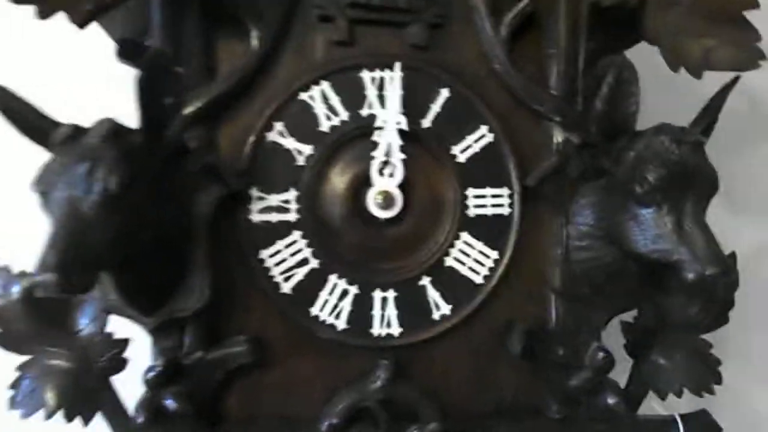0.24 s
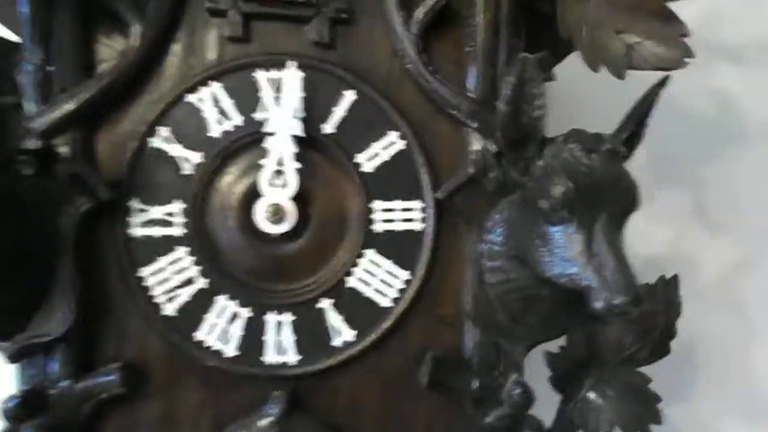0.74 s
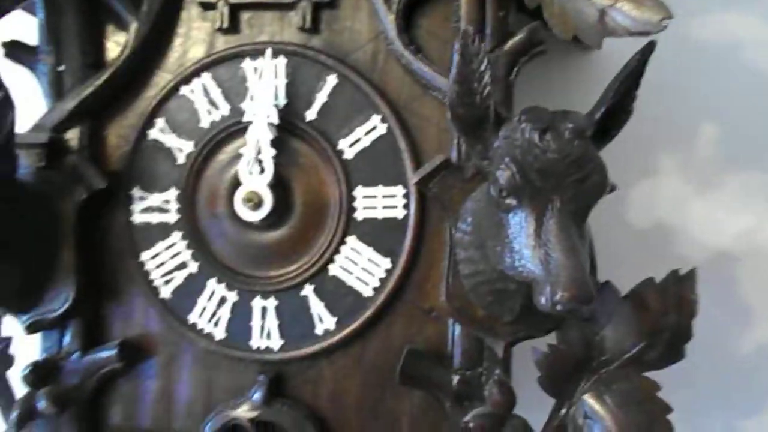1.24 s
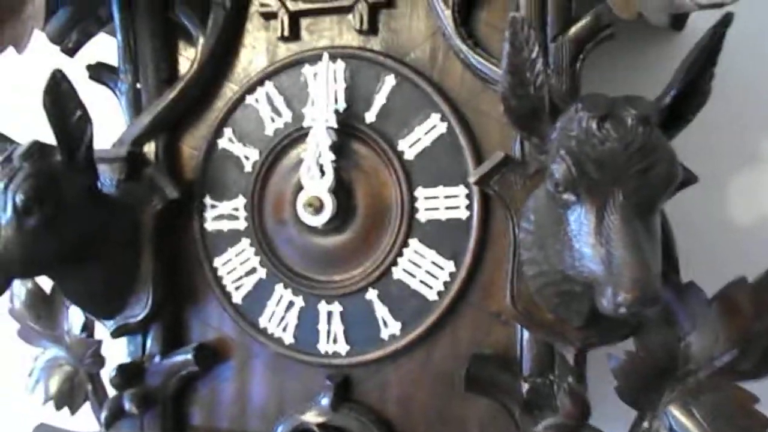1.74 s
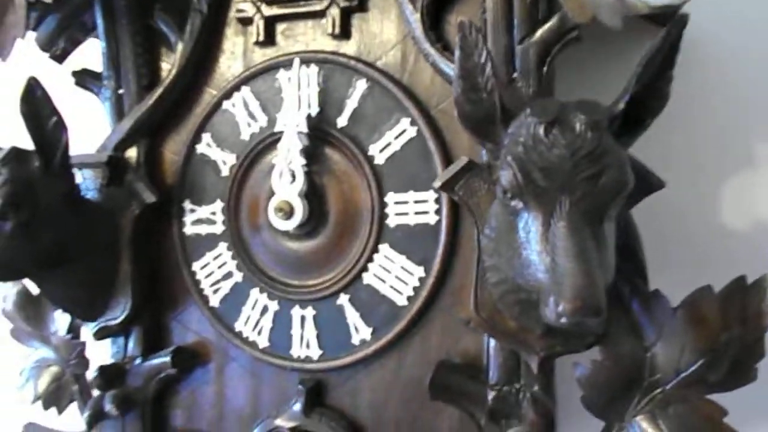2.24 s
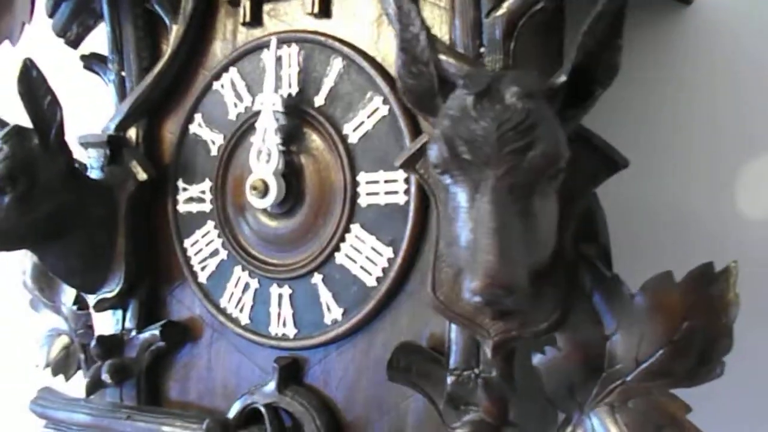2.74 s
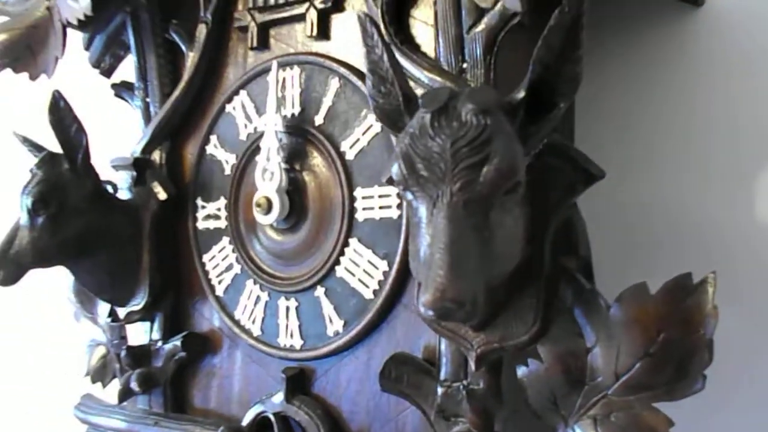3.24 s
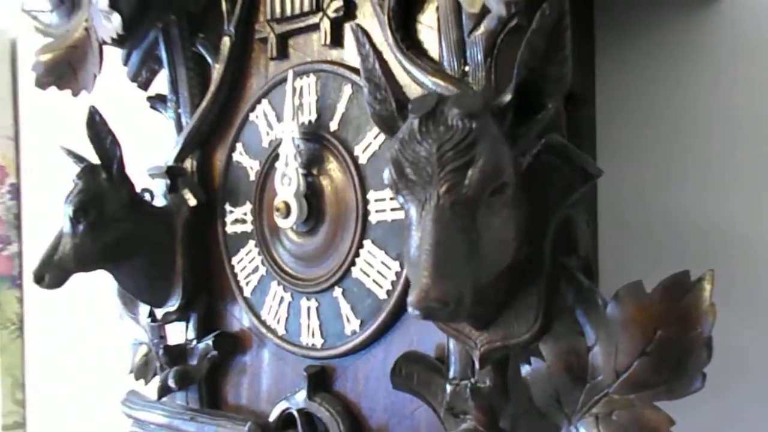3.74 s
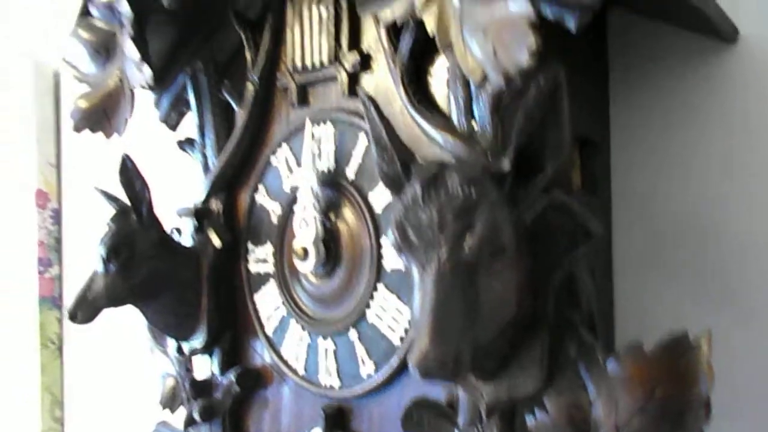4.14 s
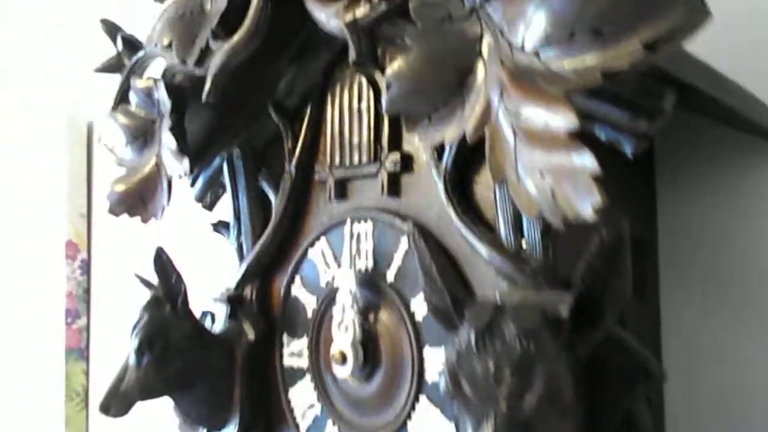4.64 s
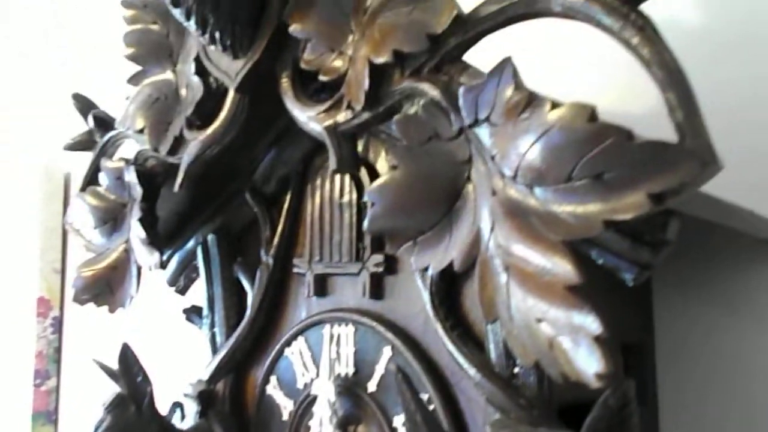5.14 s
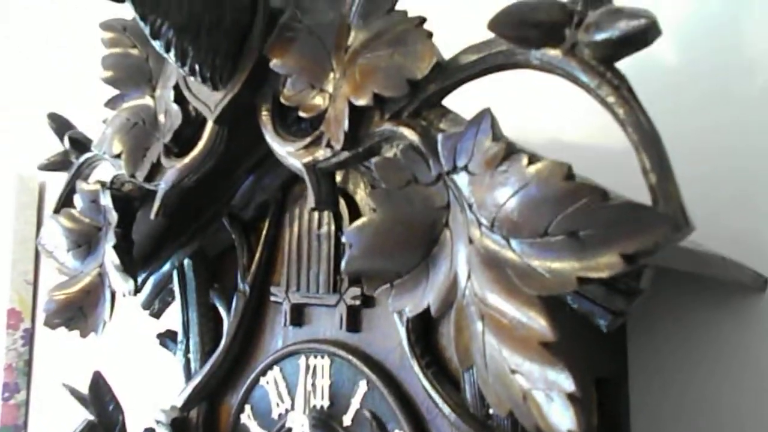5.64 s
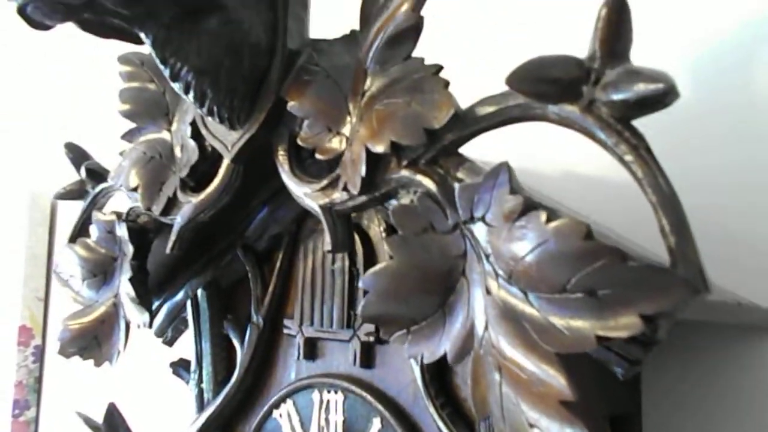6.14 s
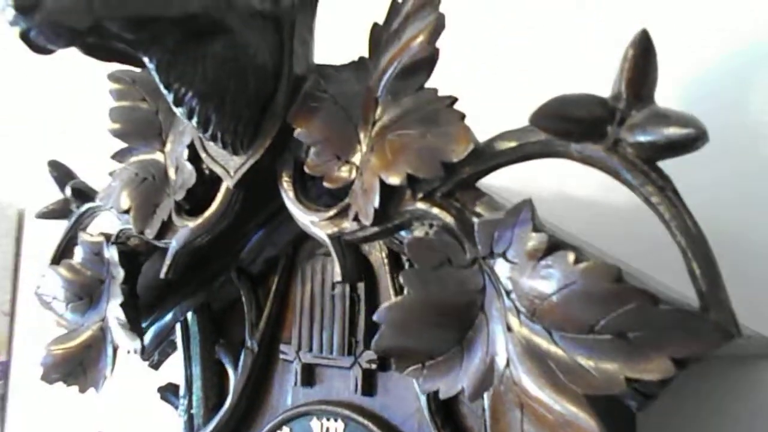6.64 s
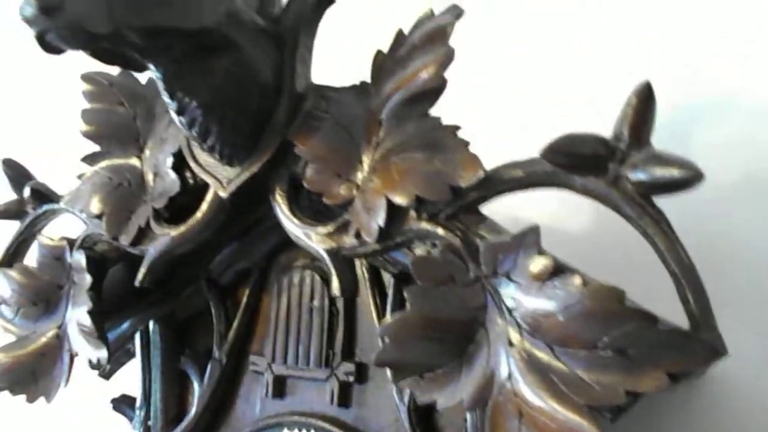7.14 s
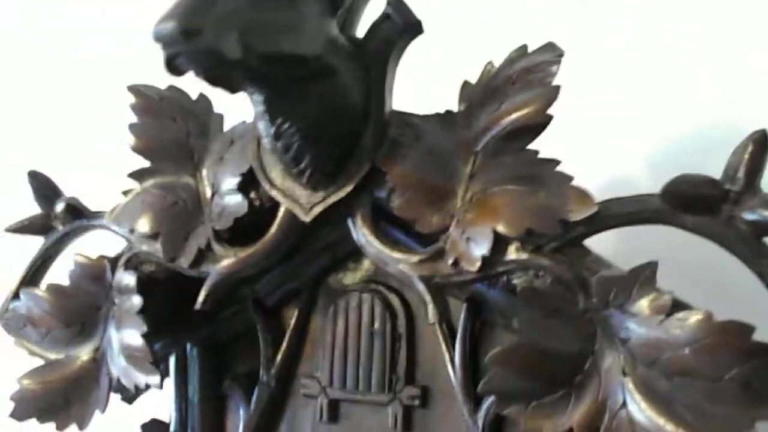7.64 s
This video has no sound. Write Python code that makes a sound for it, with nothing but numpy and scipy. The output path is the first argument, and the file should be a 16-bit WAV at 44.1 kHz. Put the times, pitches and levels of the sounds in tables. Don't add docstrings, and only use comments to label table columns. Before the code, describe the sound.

Close, woody tick-tock of a carved clock in a quiet room, an early floor creak, soft rustling and later dry finger taps.

```python
import sys
import numpy as np
from scipy import signal
from scipy.fft import rfft, irfft, next_fast_len
from scipy.io import wavfile

SR = 44100
rng = np.random.default_rng(int(sys.argv[2]) if len(sys.argv) > 2 else 0)


def volts(x):
    e = np.asarray(x, float) / 20
    return 10 ** e


def to_wav(s):
    ch = np.atleast_2d(s).T
    pcm = np.round(np.clip(ch, -1, 1) * 32767)
    wavfile.write(sys.argv[1], SR, pcm.astype(np.int16))


N = 347067


def rms_one(x):
    return x / np.sqrt(np.mean(x ** 2) + 1e-20)


def shaped(x, gain_at):
    size = next_fast_len(N + 4096)
    hz = np.maximum(np.arange(size // 2 + 1) * SR / size, 1)
    return irfft(rfft(x, size) * gain_at(hz), size)[:N]


def shaped_noise(gain_at):
    return rms_one(shaped(rng.standard_normal(N), gain_at))


def at_hz(points, hz):
    corner_hz, level_db = np.transpose(points)
    return np.interp(np.log(hz), np.log(corner_hz), level_db)


def highpass(x, order, hz):
    return signal.sosfilt(signal.butter(order, hz, "high", fs=SR, output="sos"), x)


def drift(rate_hz):
    hop = 40
    r = np.exp(-2 * np.pi * hop * rate_hz / SR)
    chance = rng.standard_normal(N // hop + 2002)
    slow = signal.lfilter([1], [1, -2 * r, r * r], chance)[2000:]
    return np.interp(np.arange(N) / hop, np.arange(len(slow)), rms_one(slow))


def clicks(times, sizes):
    out = np.full(N, 1e-18)
    np.add.at(out, np.round(np.ravel(times) * SR).astype(int), np.ravel(sizes))
    return out


def ring(x, hz, t60):
    r = volts(-60 / (t60 * SR))
    w = 2 * np.pi * hz / SR
    return signal.lfilter([0, np.sin(w)], [1, -2 * r * np.cos(w), r * r], x)


# (time [s], rustle level [dB])
MOTION = [
    (0, -65),
    (1.1, -64),
    (2.6, -66.5),
    (3.1, -74),
    (4.4, -72),
    (5.1, -74),
    (6.7, -75),
    (7.1, -66.5),
    (7.87, -70),
]
# (time [s], half length [s], rustle level [dB], hiss relative to rustle [dB])
BRUSHES = [(0.305, 0.053, -56.5, -27), (0.53, 0.24, -60.5, -17.5), (0.88, 0.046, -57, -22),
           (1.148, 0.053, -70, -2), (1.402, 0.05, -60.5, -17), (1.925, 0.081, -60.5, -14.5),
           (2.534, 0.1, -74, -1.5), (3.03, 0.099, -73.5, -11), (3.923, 0.17, -64.5, -24),
           (5.46, 0.038, -81, -16), (7.365, 0.062, -61.5, -23.5), (7.8, 0.12, -65.5, -17)]
# (frequency [Hz], density [dB per Hz])
RUSTLE_COLOUR = [(500, -8), (1200, -1), (3000, 0), (5000, -0.5), (7000, 1)]
# (frequency [Hz], density [dB per Hz])
HUM_COLOUR = [(20, -51), (38, -18.5), (167, -3.5), (318, -3), (497, -5.5), (2500, -18.5), (3250, -32),
              (5500, -120)]


def air(flicker_db):
    hiss_under_db, hum_still_db, hum_under_db = -15.5, -65, 0.5
    split_hz = 7000
    t = np.arange(N) / SR
    moving = volts(2 * np.interp(t, *np.transpose(MOTION)))
    rustle_power = moving.copy()
    hiss_power = moving * volts(2 * hiss_under_db)
    for s, half, level_db, hiss_db in BRUSHES:
        swell = volts(2 * level_db) * np.exp(-((t - s) / half) ** 2)
        rustle_power = rustle_power + swell
        hiss_power = hiss_power + swell * volts(2 * hiss_db)
    hum_power = volts(2 * hum_still_db) + rustle_power * volts(2 * hum_under_db)
    rustle = shaped_noise(lambda hz: volts(at_hz(RUSTLE_COLOUR, hz)) * (hz < split_hz))
    hum = shaped_noise(lambda hz: volts(at_hz(HUM_COLOUR, hz)))
    hiss = shaped_noise(lambda hz: (hz > split_hz) * (hz < 12000))
    cloth = rustle * volts(4.5) * np.sqrt(rustle_power) + hiss * volts(17.5) * np.sqrt(hiss_power)
    cloth_flicker = volts(0.45 * flicker_db * drift(14.0))
    hum_flicker = volts(flicker_db * drift(17.0))
    return cloth_flicker * cloth + hum * np.sqrt(hum_power) * hum_flicker


def snap_and_crack(times, facing_db, crack_hz, snap_db, crack_db, crack_t60):
    out = highpass(volts(snap_db) * clicks(times, volts(facing_db)), 2, 2500)
    t = np.arange(1024) / SR
    envelope = volts(-60 * t / crack_t60) * np.clip(t / 0.0004, 0, 1)
    sizes = volts(facing_db + crack_db)
    for s, size, hz in zip(times.ravel(), sizes.ravel(), np.repeat(crack_hz, times.shape[1])):
        i = round(s * SR)
        out[i:i + len(t)] += size * np.sin(2 * np.pi * hz * t) * envelope
    return out


# (frequency [Hz], tick [dB], tock [dB], play
# [dB], t60 [s])
MODES = [(428, -21, -15, -21, 0.35), (645, -7.5, -2, 5, 0.03), (762, 1.5, 3.5, 2.5, 0.053),
         (882, -2.5, -1, -21, 0.046), (1013, -6, -9.5, -18, 0.076), (1176, -19.5, -19, -23, 0.08),
         (1423, 7.5, -1, -16, 0.061), (1590, -4.5, -12, 4.5, 0.042), (1668, 1, -3.5, 2, 0.047),
         (1835, 5, -2.5, -1, 0.014), (1900, -3, -13, -13, 0.071), (2044, 4, -16, 3, 0.029),
         (2428, -5.5, -10, 0, 0.059), (2736, 1, 2, 9, 0.0051),
         (3020, -20, -24, -17, 0.009), (3256, 0.5, -4, 2, 0.017), (3590, 0.5, -0.5, -10, 0.013),
         (3696, -4.5, 0, -13, 0.017), (4140, 1.5, -6, -18, 0.025), (4250, 2, -16, -29, 0.0077),
         (4670, -2.5, -20, -18, 0.035), (4600, -13, -26, -18, 0.1), (5280, 7.5, 7.5, 9, 0.0092),
         (5140, 7, 1, 7, 0.0099), (5670, 8.5, 5.5, -14, 0.0069), (5396, -20, -20.5, -20, 0.22),
         (6200, -11, -5.5, -16, 0.015)]
TOP_DB = [-0.5, 0, -6]


def clock_modes(times, kind, knock_db, facing_db, spread_db, level_db):
    low_force_db = knock_db + 5
    top_force_db = low_force_db + np.array(TOP_DB)[kind - 1, None]
    out = np.zeros(N)
    for k, mode in enumerate(MODES):
        hz, t60 = mode[0], mode[4]
        force_db = low_force_db if hz <= 2800 else facing_db if hz <= 4800 else top_force_db
        mode_db = np.array(mode)[kind][:, None] + spread_db * rng.standard_normal(times.shape)
        strikes = clicks(times, volts(force_db + mode_db + level_db))
        out += (-1) ** k * ring(strikes, hz, t60)
    return out


# (frequency [Hz], density [dB per Hz])
RATTLE = [(250, -29), (750, 4.5), (1600, 2.5), (2600, 1.5), (3700, 0), (5400, -6.5), (6600, -16),
          (7500, -17)]
# (frequency [Hz], density [dB per Hz])
LINGER = [(400, -1.5), (800, -2), (1550, -3.5), (2600, -8.5), (3700, 0), (4850, -6.5), (5450, -3.5),
          (7000, -20.5)]


def loose_wood(onsets, knock_db, rattle_db, rattle_t60, linger_db, linger_t60):
    shake = clicks(onsets + .002, volts(knock_db))
    out = np.zeros(N)
    for colour, db, t60 in [(RATTLE, rattle_db, rattle_t60), (LINGER, linger_db, linger_t60)]:
        dying = signal.lfilter([volts(db)], [1, -volts(-60 / (t60 * SR))], shake)
        out += dying * shaped_noise(lambda hz: volts(at_hz(colour, hz)) * (hz > 250))
    return out


# (time [s], knock on the case [dB], crack facing the microphone [dB], crack frequency [Hz])
TICKS = [(0.1279, -30.5, -19, 3760), (1.1947, -29, -15.5, 4250), (2.2613, -26.5, -16, 4160),
         (3.3249, -27.5, -19, 3360), (4.3896, -29, -15.5, 3230), (5.452, -29, -18, 4440),
         (6.5181, -28.5, -18.5, 3320), (7.5831, -28.5, -18.5, 4600)]
# (time [s], knock on the case [dB], crack facing the microphone [dB], crack frequency [Hz])
TOCKS = [(0.6195, -30, -18, 3720), (1.683, -29, -19, 3880), (2.7518, -28, -18.5, 3590),
         (3.817, -28.5, -18, 3400), (4.8821, -28, -18, 3430), (5.949, -27.5, -16.5, 3340),
         (7.012, -29.5, -17, 3430)]
# (time [s], knock [dB], facing crack [dB], crack frequency [Hz])
PLAY = [(2.393, -54.5, -62, 1710), (3.4555, -51.5, -39.5, 1520), (4.514, -48.5, -35, 2880),
        (5.5775, -47, -38, 2430), (6.6447, -49, -38.5, 2380), (7.244, -51.5, -39.5, 1500),
        (7.7122, -50.5, -44, 1610)]
# (time after onset [s], tick [dB], tock [dB], play [dB])
CONTACTS = [
    (0, -8.5, -2, -11),
    (.0006, -2, 1.5, -2),
    (.0017, -12.5, -7.5, 3),
    (.0039, -7, -23, -20),
    (.0058, -4.5, -2.5, -16),
]


def escapement(spread_db, level_db, crack_db, crack_t60, snap_db, rattle_db, rattle_t60, linger_db, linger_t60):
    dulling_db_per_s = 456
    beats = np.array(TICKS + TOCKS + PLAY, float)
    kind = np.repeat([1, 2, 3], [len(TICKS), len(TOCKS), len(PLAY)])
    contacts = np.array(CONTACTS)
    delay, contact_db = contacts[:, 0], contacts.T[kind]
    jitter = rng.normal(0, .0001, (len(beats), len(contacts)))
    times = beats[:, :1] + delay + jitter
    knock_db = beats[:, 1:2] + contact_db
    facing_db = beats[:, 2:3] + contact_db - dulling_db_per_s * delay
    out = snap_and_crack(times, facing_db, beats[:, 3], snap_db, crack_db, crack_t60)
    out += clock_modes(times, kind, knock_db, facing_db, spread_db, level_db)
    out += loose_wood(beats[:, 0], beats[:, 1], rattle_db, rattle_t60, linger_db, linger_t60)
    return highpass(out, 4, 220)


def room(x):
    t60, wall_cut_hz = 0.31, 1170
    t = np.arange(SR // 2) / SR
    dull = signal.lfilter([1], [1, -np.exp(-2 * np.pi * wall_cut_hz / SR)], rng.standard_normal(len(t)))
    tail = dull * volts(-60 * t / t60) * np.clip(t / 0.018, 0, 1)
    return signal.fftconvolve(x, tail / np.sqrt(np.sum(tail ** 2)))[:N]


# (time [s], half length [s], level [dB], low edge [Hz], high edge [Hz])
SCUFFS = [
    (0.26, 0.033, -51, 550, 1160),
    (0.453, 0.052, -56.5, 250, 1900),
]


def scuff():
    t, noise = np.arange(N) / SR, rng.standard_normal(N)
    out = np.zeros(N)
    for s, half, db, low_hz, high_hz in SCUFFS:
        band = signal.butter(2, [low_hz, high_hz], "band", fs=SR, output="sos")
        swell = np.exp(-((t - s) / half) ** 2 / 2)
        out += volts(db) * swell * rms_one(signal.sosfilt(band, noise))
    return out


# (time [s], peak level [dB], bright part [dB])
CREAK = [
    (0.399, -34.5, -11),
    (0.417, -34, -12.5),
    (0.433, -47, 0),
    (0.448, -37.5, -9.5),
    (0.466, -31, -16),
    (0.484, -34, -14.5),
    (0.505, -41, -12),
    (0.526, -44, -12),
    (2.74, -36, -22),
    (2.744, -35.5, -10.5),
]
# (frequency [Hz], level [dB], t60 [s])
BOARD = [(94.2, -14, 0.17), (156, -8.5, 0.13), (238, -3.5, 0.1), (390, 2, 0.019), (527, -9, 0.21),
         (760, 1, 0.032), (1040, -6, 0.051), (1500, -8, .02), (2000, -31, .012)]


def creak():
    s, peak_db, bright_db = np.transpose(CREAK)
    board = np.zeros(N)
    for k, (hz, level_db, t60) in enumerate(BOARD):
        slip_db = peak_db + level_db - 6 + (hz > 300) * (bright_db + 10)
        board += (-1) ** k * ring(clicks(s, volts(slip_db)), hz, t60)
    return highpass(board, 2, 70)


# (time [s], peak level [dB], dull part [dB])
FINGERS = [(2.0432, -47, -63), (2.741, -39, -41), (2.7433, -36, -46), (5.793, -45, -78), (5.842, -48, -70),
           (6.3794, -33, -65), (6.451, -46, -75), (6.4887, -34.5, -53.5), (6.683, -49, -55),
           (6.7465, -54, -75), (6.7544, -36, -64), (6.799, -26.5, -34), (6.824, -56, -75),
           (6.9548, -61, -59), (6.963, -37.5, -55), (7.142, -37, -61.5), (7.458, -36, -52)]


def fingers():
    s, peak_db, dull_db = np.transpose(FINGERS)
    burst = rng.standard_normal(88) * volts(-np.arange(88) * 0.13)
    snap = np.convolve(clicks(s, volts(peak_db - 1.5)), burst)[:N]
    snap = highpass(snap, 2, 1500)
    snap = signal.lfilter([1, -.5], [1], snap)
    touch = clicks(s, volts(dull_db))
    shell = ring(touch, 1020, 0.0083)
    shell += volts(-12) * ring(touch, 870, 0.015)
    shell -= volts(-4) * ring(touch, 1450, 0.025)
    return snap + shell


def scene():
    close = air(flicker_db=2.12)
    clock = escapement(spread_db=2.5, level_db=-13.0, crack_db=1.5, crack_t60=0.0078, snap_db=-1.5,
                       rattle_db=-10, rattle_t60=0.073, linger_db=-15.5, linger_t60=0.28)
    close += scuff()
    knocks = clock + creak()
    close += fingers()
    return (knocks + volts(-20) * room(knocks) + close)[None]


def band_limit(x):
    return signal.sosfilt(signal.butter(12, 11870, fs=SR, output="sos"), x)


# (frequency [Hz], gain [dB])
MIC = [(4500, 1), (5600, -3), (6300, -9.5), (7000, -14), (9200, -14.5), (10800, -8.5), (11400, -15.5),
       (11900, -40)]


def record(dry):
    null_hz, null_step_hz = 7000, 1500

    def path_gain(hz):
        ripple = np.sin(np.pi * np.clip((hz - null_hz) / null_step_hz, -.5, 2.5))
        return -ripple * volts(at_hz(MIC, hz))

    heard = shaped(dry[0], path_gain)
    return band_limit(heard[None])


dry = scene()
out = record(dry)
to_wav(out)
```